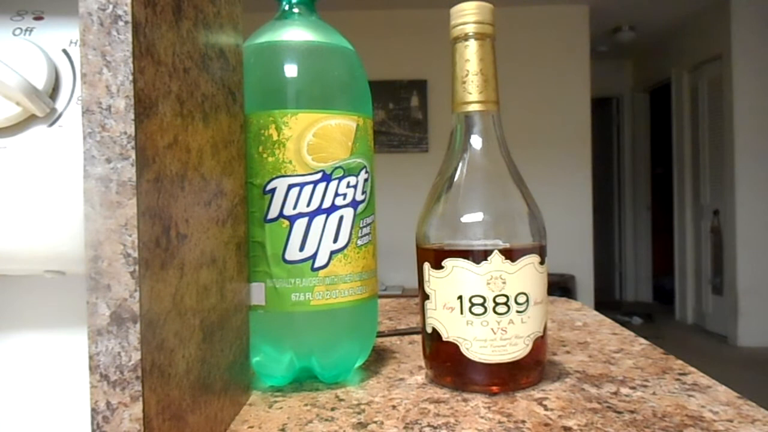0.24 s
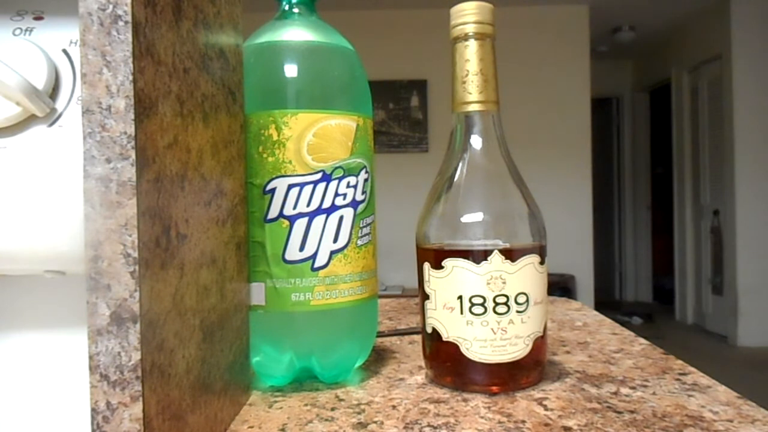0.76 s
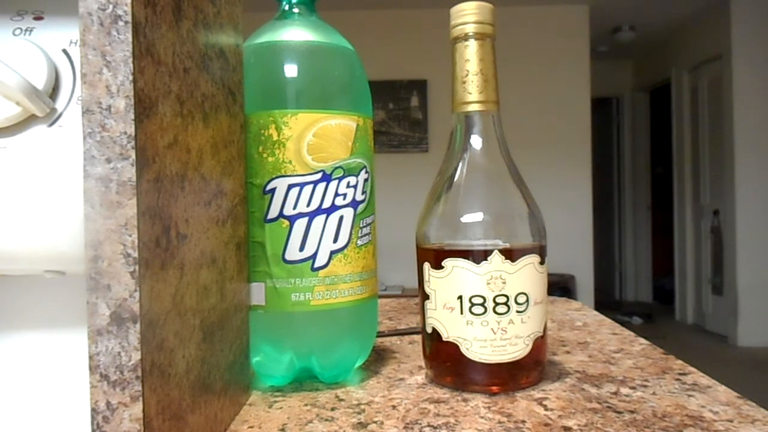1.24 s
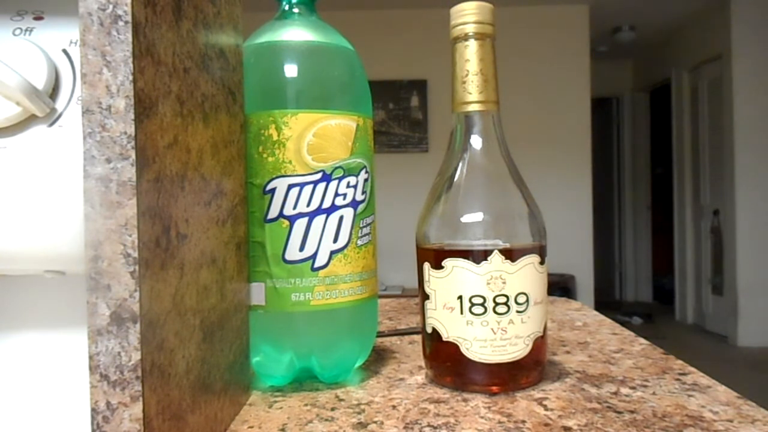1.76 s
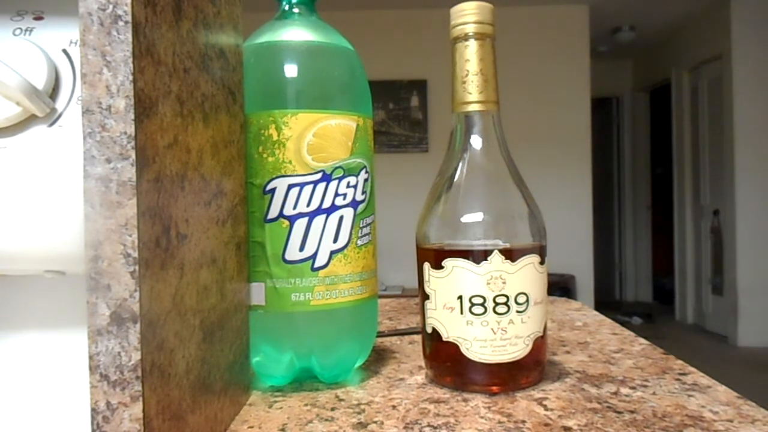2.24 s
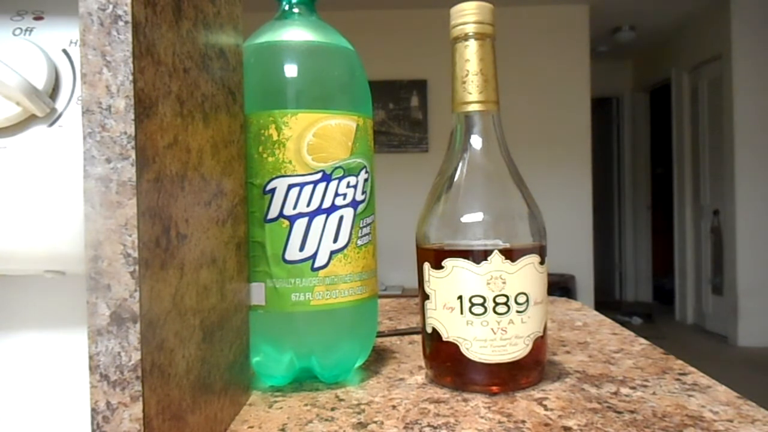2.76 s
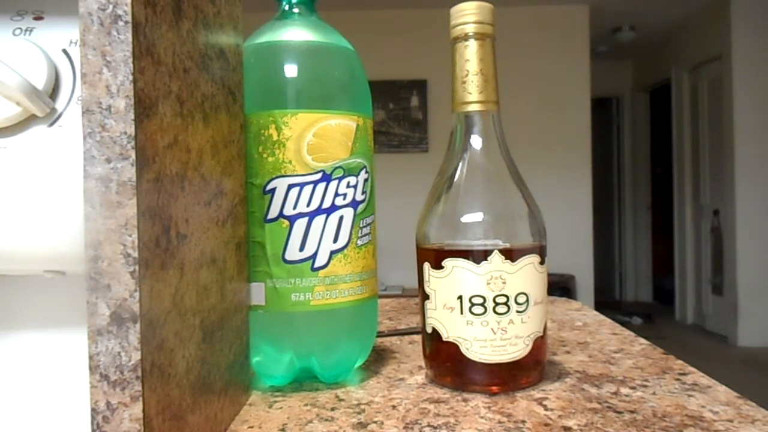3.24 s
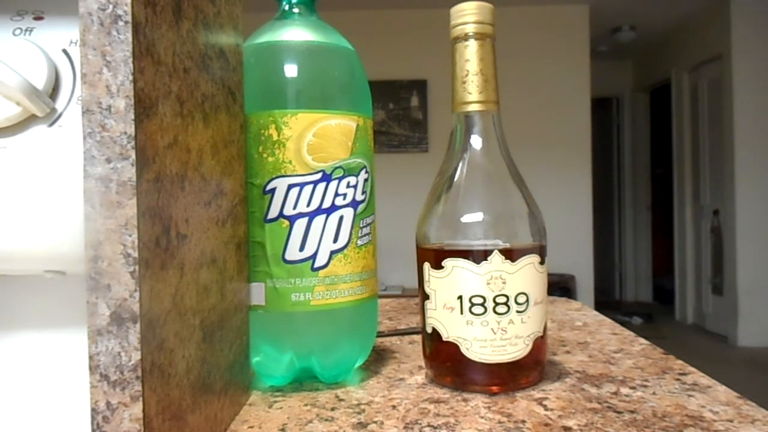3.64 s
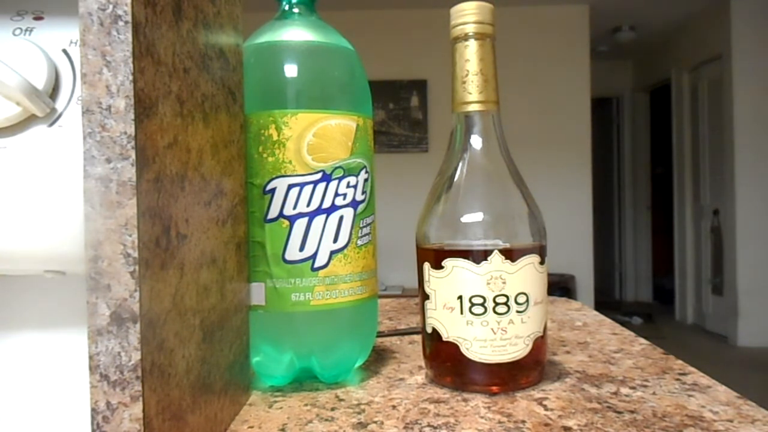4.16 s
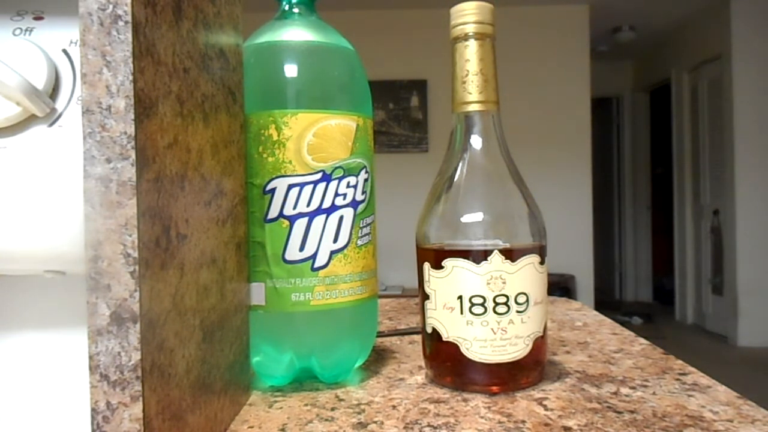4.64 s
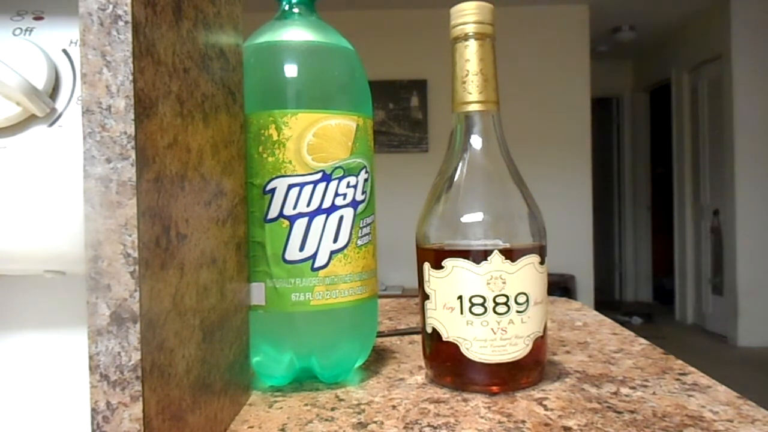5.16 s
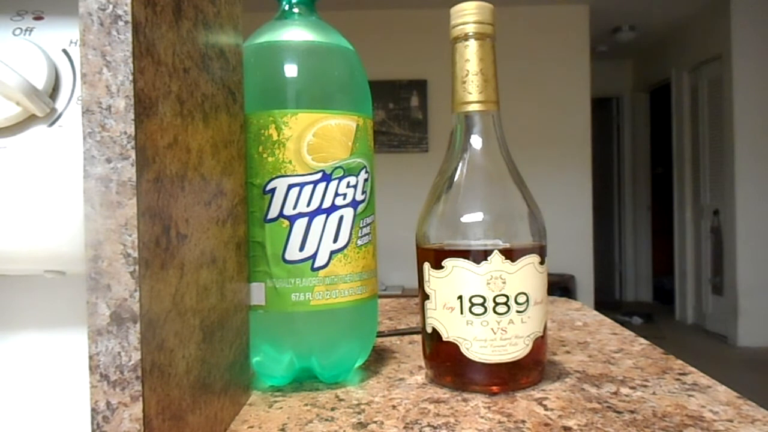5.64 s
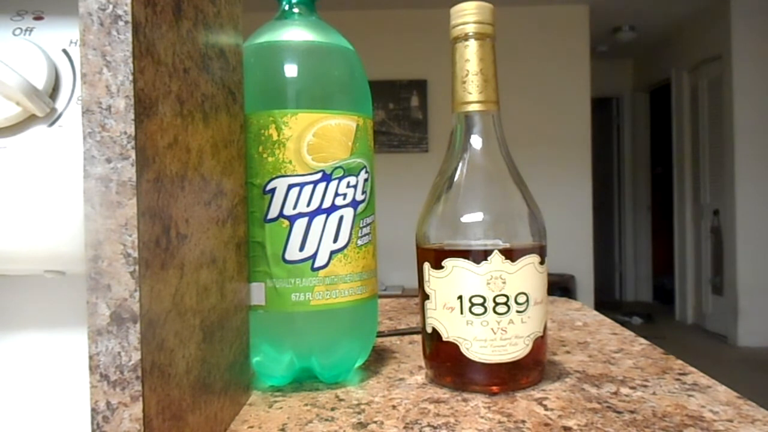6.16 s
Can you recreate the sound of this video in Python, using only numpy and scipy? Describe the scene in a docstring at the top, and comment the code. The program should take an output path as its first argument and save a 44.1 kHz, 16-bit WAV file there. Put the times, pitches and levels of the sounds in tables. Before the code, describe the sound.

Over a steady fridge hum in a hard-walled kitchen, a plastic ice tray is twisted, creaking densely while cubes break loose with sharp, loud cracks. Cubes then rattle and knock against the hollow plastic for over a second. After a quiet gap, one cube lands in a thick glass with a loud clink and several quick bounces. The microphone is a few steps away and distorts slightly on the hardest hits.

```python
"""Ice from a tray into a glass

A few steps from the microphone in a hard-walled kitchen, over the hum of a fridge and faint ticks of ice,
a plastic tray is twisted: it creaks and the cubes crack loose. They rattle and knock in the plastic, then
one drops into a thick glass and bounces. Contacts are shaped clicks with scattered reflections, most with
ringing modes; the motor is sines, the air filtered noise. The loudest hits overload the microphone."""
import sys
import numpy as np
from scipy import signal
from scipy.fft import rfft, irfft
from scipy.io import wavfile

SR = 44100
rng = np.random.default_rng(int(sys.argv[2]) if len(sys.argv) > 2 else 0)


def transcribe(signal):
    """Save signal, clipped to [-1, 1], as a 16-bit WAV file at the path in sys.argv[1]."""
    frames = np.atleast_2d(signal).T
    limited = np.clip(frames, -1, 1)
    pcm = np.round(limited * 32767).astype(np.int16)
    wavfile.write(sys.argv[1], SR, pcm)


N = 282681
TIME = np.arange(N) / SR

# broad colour of ice knocking on plastic: (frequency [Hz], relative level [dB])
KNOCK_COLOUR = [(100, -60), (240, -24.5), (310, -2), (480, -10), (750, 0), (1100, -3.5), (1300, -6),
                (2100, -3), (4400, -13.5), (5300, -19.5), (7500, -26), (9500, -42.5), (10800, -49),
                (15500, -43)]


def from_db(db):
    """Decibels to amplitude."""
    return 10 ** (np.asarray(db) / 20)


def unit_energy(x):
    """Scales a signal to a sum of squares of 1."""
    return x / np.sqrt(np.sum(x ** 2) + 1e-20)


def at_hz(points, hz):
    """Reads a table on a log-frequency axis."""
    freq, value = np.transpose(points)
    return np.interp(np.log(np.maximum(hz, 1)), np.log(freq), value)


def through(x, response):
    """Convolves a sound with the impulse response of a body or place."""
    return signal.fftconvolve(x, response)[:len(x)]


def add(out, s, sound):
    """Mixes a sound in at time s."""
    start = round(s * SR)
    out[start:start + len(sound)] += sound[:N - start]


def snap(colour, bright=0, pitch_hz=1000, bump_db=0, size=2048):
    """Minimum-phase click with this colour, a tilt [dB per octave] and one broad resonance; energy 1."""
    hz = np.maximum(np.arange(size // 2 + 1) * SR / size, 1)
    tilt = bright * np.log2(np.clip(hz, 300, 9000))
    bump = bump_db / (1 + (np.log2(hz / pitch_hz) / 0.18) ** 2)
    cepstrum = irfft(np.log(from_db(at_hz(colour, hz) + tilt + bump)))
    # folding the cepstrum forward packs the energy as early as possible
    cepstrum[1:size // 2] *= 2
    cepstrum[size // 2 + 1:] = 0
    return unit_energy(irfft(np.exp(rfft(cepstrum))))


def ringing(modes, vary_db=0):
    """Half a second of decaying sines with random phases and, if varied, random strengths; energy 1."""
    t = TIME[:SR // 2]
    swell = 1 - np.exp(-t / 0.00054)
    total = 0
    for hz, db, t60 in modes:
        strength = from_db(db + vary_db * rng.normal())
        sine = np.sin(2 * np.pi * (hz * t + rng.random()))
        decay = from_db(-60 * t / max(t60, .001))
        total = total + strength * unit_energy(swell * sine * decay)
    return unit_energy(total)


def scatter(t60, build_s):
    """Dense burst of first reflections off cupboards and counter, different from every spot; energy 1."""
    t = TIME[:SR // 2]
    knots = t[::66]
    uneven = from_db(1.6 * np.interp(t, knots, rng.standard_normal(len(knots))))
    swell = 1 - np.exp(-t / max(build_s, .0002))
    decay = from_db(-60 * t / max(t60, .01))
    return unit_energy(rng.standard_normal(len(t)) * uneven * swell * decay)


def blow(click, t60, build_s, modes, ring_db):
    """One contact, its first reflections and the struck body's ring; rms 1 if packed into 10 ms."""
    reflections = through(scatter(t60, build_s), click)
    ring = from_db(ring_db) * ringing(modes, vary_db=4)
    return unit_energy(reflections + ring) * np.sqrt(SR / 100)


def grains(per_s, spread_db):
    """Random clicks of uneven size; rms 1."""
    sizes = from_db(spread_db * np.clip(rng.standard_normal(N), -2, 2))
    signed = sizes * rng.choice([-1, 1], N)
    happens = rng.random(N) < per_s / SR
    return unit_energy(signed * happens) * np.sqrt(N)


def jostle(strength, colour, per_s, spread_db, t60, bump_db, count=12):
    """Small contacts of several cubes, each with a pitch and reflections of its own."""
    cubes = []
    for hz in np.geomspace(750, 6500, count):
        click = snap(colour, 0, hz, bump_db)
        cubes.append(unit_energy(through(scatter(t60, 0.00016), click)))
    contacts = sum(through(strength * grains(per_s / count, spread_db), cube) for cube in cubes)
    return contacts / np.sqrt(count)


def kitchen(x, tail_db, build_s):
    """Adds the room's tail band by band: long in the bass and near 4 kHz, shorter between, shortest on top."""
    # kitchen reverberation: (frequency [Hz], t60 [s])
    room_t60 = [(200, 0.79), (1500, 0.4), (4000, 0.73), (10000, 0.12)]
    t = TIME[:SR * 3 // 4]
    swell = 1 - np.exp(-t / max(build_s, .001))
    edges = np.geomspace(60, 20000, num=18)
    tail = 0
    for low, high in zip(edges, edges[1:]):
        band_pass = signal.butter(2, [low, high], "band", fs=SR, output="sos")
        band = signal.sosfilt(band_pass, rng.standard_normal(len(t)))
        decay = from_db(-60 * t / at_hz(room_t60, np.sqrt(low * high)))
        share = np.sqrt(2 * (high - low) / SR)   # a wide band holds more energy
        tail = tail + share * unit_energy(band * swell * decay)
    return x + from_db(tail_db) * through(x, tail)


def fridge():
    """Motor and fan tones with slowly wandering phase, over an even rush of air and a fan's resonances."""
    # motor and fan tones: (frequency [Hz], level [dB])
    hum = [(59.5, -72), (119, -74), (147, -73.5), (188, -69.5), (358, -65.5), (416, -59), (425, -63.5),
           (638, -66), (1125, -57), (1362, -61), (2826, -62), (3121, -59.5)]
    # colour of the rushing air: (frequency [Hz], relative level [dB])
    hiss = [(30, -26), (64, -16), (95, -31), (182, -9), (324, -9), (430, -5.5), (1170, -3), (1590, -7.5),
            (3300, -6.5), (4910, -12.5), (7080, -13.5), (9900, -28), (10700, -37.5), (15500, -31)]
    # resonances of the fan: (frequency [Hz], relative level [dB], t60 [s])
    fan_modes = [(418, -9, 0.027), (693, -0.5, 0.036), (1175, 0.5, 0.027), (3400, 2.5, 0.011),
                 (4550, 3.5, 0.0023)]
    knots = np.linspace(0, N / SR, num=40)
    tones = 0
    for hz, db in hum:
        wander = np.interp(TIME, knots, np.cumsum(rng.normal(0, 1.187, len(knots))))   # radians
        tones = tones + from_db(db) * np.sqrt(2) * np.sin(2 * np.pi * hz * TIME + wander)
    air = from_db(-42.7) * through(rng.standard_normal(N), snap(hiss))
    fan = from_db(-48.5) * through(rng.standard_normal(N), ringing(fan_modes))
    return tones + air + fan


def faint_ticks():
    """The warming ice gives tiny ticks at random moments, each a click with short reflections."""
    tick = unit_energy(through(scatter(0.021, 0.00027), snap(KNOCK_COLOUR, bright=1.5)))
    ticks = through(grains(per_s=16, spread_db=0.5), tick)
    return from_db(-55) * kitchen(ticks, tail_db=-5.0, build_s=0.018)


def swell_and_ease(peak_s):
    """Strain builds up to its peak and eases after it, at steady rates in dB."""
    rise_db_per_s, fall_db_per_s = 59, 76
    return from_db(np.minimum(rise_db_per_s * (TIME - peak_s), fall_db_per_s * (peak_s - TIME)))


def twisted_tray():
    """The tray creaks under strain in dense small contacts; cubes break free in cracks that ring it."""
    # ice cracking loose, with one low knock at 0.951 s: (time [s], level [dB], brightness [dB per octave], #
    # pitch of the cube [Hz], its prominence [dB])
    cracks = [(0.2653, -14.5, -1.5, 3780, 4), (0.389, -14, 0.5, 1800, 13), (0.4206, -2.5, 1.3, 4100, 3.5),
              (0.4378, -9, -2.5, 3000, 9.5), (0.54, -20.5, -0.5, 3850, 9), (0.8556, -7.5, -1.5, 3060, 2.5),
              (0.8606, -6, -3, 3200, 11), (0.951, -18.5, -4.5, 500, 14.5), (0.975, -17.5, -4.5, 3030, 9.5),
              (1.03, -24, -2, 1800, 15), (1.08, -23, -0.5, 2030, 14), (1.15, -24.5, -6.5, 3020, 25),
              (1.164, -21, 2, 3000, 6.5)]
    # broad colours of cracks and creak: (frequency [Hz], relative level [dB])
    crack_colour = [(150, -50), (300, -36), (600, -20.5), (900, -14), (1100, -4.5), (2100, -2.5),
                    (3100, -1), (4400, -3.5), (5100, -8), (7200, -10.5), (9000, -21.5), (10800, -37),
                    (15500, -31)]
    creak_colour = [(200, -37), (450, -29), (900, -10), (1800, -4.5), (2500, -6.5), (3400, 1), (4500, -1.5),
                    (5100, -8.5), (7000, -10.5), (9500, -20.5), (10800, -30), (15500, -23)]
    # ringing of the tray: (frequency [Hz], relative level [dB], t60 [s])
    tray_modes = [(1078, 1, 0.3), (1470, 2, 0.19), (2730, -14, 0.13), (3030, -3, 0.11), (3410, 2.5, 0.13),
                  (3630, 2, 0.17), (4010, 1, .2), (4300, -1, 0.35), (4510, 1, 0.27), (6250, -2, 0.06),
                  (7170, -21, 0.091)]
    # flexing of the tray: (time of greatest strain [s], level of its creak [dB])
    twists = [(0.46, -24), (0.86, -28.5), (1.16, -35.5)]
    # a strong crack is a clean break, a weak one crumbles on
    t60_at_0_db_s, doubling_drop_db = 0.12, 14   # t60 doubles with each such drop in level
    out = np.zeros(N)
    for s, db, bright, pitch_hz, bump_db in cracks:
        t60 = t60_at_0_db_s * 2 ** (-db / doubling_drop_db)
        click = snap(crack_colour, bright, pitch_hz, bump_db)
        add(out, s, from_db(db) * blow(click, t60, 0.0028, tray_modes, ring_db=-11))
    strain = np.max([from_db(db) * swell_and_ease(s) for s, db in twists], axis=0)
    out += jostle(strain, creak_colour, per_s=1000, spread_db=3.5, t60=0.079, bump_db=10)
    return kitchen(out, tail_db=-12.5, build_s=0.015)


def knocking_cubes():
    """Single cubes strike the plastic: glancing is bright, skittering, little ring; square is the reverse."""
    # knocks on the plastic: (time [s], level [dB], brightness [dB per octave],
    # pitch of the knock [Hz], its prominence [dB])
    knocks = [(1.815, -32, 7, 3440, 8), (1.999, -12.5, 4.5, 1700, 6.5), (2.057, -12.5, 5.5, 3430, 4.5),
              (2.2076, -14.5, 3, 2070, 6.5), (2.219, -12, -12, 1070, 19), (2.335, -14.5, 2.5, 3400, 8),
              (2.566, -14, 1, 790, 6), (2.587, -18.5, 3, 6200, 12.5), (2.653, -13, -0.5, 2180, 11.5),
              (2.736, -13, 0.5, 2050, -1), (2.908, -22.5, -0.5, 880, 2), (2.982, -25.5, 0, 1200, 5),
              (3.1075, -14.5, -0.5, 2000, 5.5), (3.294, -19.5, 1, 850, 4.5), (3.311, -21, 0.5, 3220, 11.5),
              (3.33, -25, 1.5, 2230, 3), (4.066, -29.5, 5, 2800, 2), (5.139, -36.5, 1.5, 705, 2)]
    # ringing of the plastic: (frequency [Hz], relative level [dB], t60 [s])
    plastic_modes = [(322.8, -6, 0.22), (589, -6.5, 0.9), (648, -6, 0.53), (857, -4.5, 0.11),
                     (928, -6, 0.37), (1086.4, 1.5, 0.15)]
    # t60 at brightness 0, its factor per step of brightness, its least value
    even_t60_s, skitter_growth, shortest_t60_s = 0.26, 1.21, 0.19
    even_ring_db, ring_loss_db = -10, 1.7   # at brightness 0; loss per step of brightness
    out = np.zeros(N)
    for s, db, bright, pitch_hz, bump_db in knocks:
        t60 = max(even_t60_s * skitter_growth ** bright, shortest_t60_s)
        ring_db = even_ring_db - ring_loss_db * bright
        click = snap(KNOCK_COLOUR, bright, pitch_hz, bump_db)
        add(out, s, from_db(db) * blow(click, t60, 0.003, plastic_modes, ring_db))
    return out


def surge(start_s, hold_s, release_db_per_s):
    """The heap of cubes shifts: quick attack, hold, steady release."""
    attack = np.clip((TIME - start_s) / 0.0061, 0, 1)
    return attack * from_db(-release_db_per_s * np.maximum(TIME - start_s - hold_s, 0))


def rattling_cubes():
    """Loose cubes tumble, slide and knock in random contacts; the hollow plastic booms under them."""
    # surges of the heap: (start [s], hold [s], level [dB], boom of the plastic [dB])
    surges = [(2.003, 0.022, -25.5, -27.5), (2.199, 0.099, -23, -26.5), (2.36, 0.1, -22.5, -31.5),
              (2.479, 0.086, -20.5, -25.5), (2.583, 0.15, -22, -32), (2.735, 0.047, -22.5, -28)]
    # broad colours of tumbling and of sliding: (frequency [Hz], relative level [dB])
    tumble_colour = [(100, -62), (240, -26), (310, -8.5), (480, -9), (850, 0), (1350, -5), (2200, -7.5),
                     (4300, -11.5), (5300, -20), (7500, -26), (9500, -40), (10800, -50), (15500, -51)]
    grit_colour = [(1500, -22), (4000, 6), (6500, -8), (8500, -12), (11000, -23), (15000, -19)]
    # boom of the hollow plastic: (frequency [Hz], relative level [dB], t60 [s])
    boom_modes = [(312, -4.5, 0.2), (358.8, -10, 0.27), (589, -9.5, 0.29), (1081, -9.5, 0.099)]
    tumble_release, boom_release = 106, 280   # dB per s
    tumble = np.max([from_db(db) * surge(s, hold, tumble_release) for s, hold, db, _ in surges], axis=0)
    boom = np.max([from_db(db) * surge(s, hold, boom_release) for s, hold, _, db in surges], axis=0)
    out = knocking_cubes()
    out += jostle(tumble, tumble_colour, per_s=300, spread_db=2.0, t60=0.11, bump_db=6)
    sliding = tumble ** 0.74   # follows this share of the tumble's swing in dB
    out += from_db(-23) * jostle(sliding, grit_colour, per_s=380, spread_db=5, t60=0.056, bump_db=14)
    out += through(boom * grains(per_s=450, spread_db=3.5), ringing(boom_modes))
    # the rattle carries almost no bass
    out = signal.sosfilt(signal.butter(4, 140, "high", fs=SR, output="sos"), out)
    return kitchen(out, tail_db=-7, build_s=0.019)


def ice_in_glass():
    """A cube hits the wall and bottom of the glass, bounces and settles; each contact rings its modes."""
    # landings: (time [s], level [dB], t60 [s], brightness [dB per octave])
    drops = [(5.4057, -2.5, 0.064, 0.5), (5.539, -13.5, 0.071, -0.5), (5.5964, -7.5, 0.16, 0),
             (5.63, -17, 0.11, 3.5), (5.72, -27, 0.19, -6.5)]
    # in each landing an edge touches, the face hits and the cube tips against the wall:
    # (delay [s], level [dB], brightness [dB per octave], ring of the glass [dB])
    landing = [(0, -7.5, -0.5, -11), (0.0033, 0, -1, -3), (0.0085, -5.5, 0.5, -8)]
    # broad colour of ice on glass: (frequency [Hz], relative level [dB])
    glass_colour = [(80, -81), (170, -20.5), (390, -26), (560, -16.5), (850, -14), (1200, 1), (2100, 2),
                    (2600, -2.5), (3500, -10), (4600, -15), (5700, -29.5), (8500, -32.5), (10800, -56),
                    (15500, -41)]
    # ringing of the glass: (frequency [Hz], relative level [dB], t60 [s])
    glass_modes = [(1197, 6, 0.14), (1440, 3, 0.067), (1471, 5, 0.17), (1576, -6, 0.59), (1790, -18, .25),
                   (1797, 9, 0.07), (1825, 0, 0.1), (2300, -15, 0.21), (2660, -7, 0.081), (2940, -8, 0.22),
                   (4670, -14, 0.12)]
    out = np.zeros(N)
    for s, db, t60, bright in drops:
        for delay_s, contact_db, contact_bright, ring_db in landing:
            click = snap(glass_colour, bright + contact_bright)
            contact = blow(click, t60, 0.00045, glass_modes, ring_db)
            add(out, s + delay_s, from_db(db + contact_db) * contact)
    return kitchen(out, tail_db=-6.5, build_s=0.011)


def scene():
    """Everything reaches one microphone."""
    return (twisted_tray() + rattling_cubes() + ice_in_glass() + faint_ticks() + fridge())[None]


def record(dry, drive_db=0.05):
    """Peaks clip at full scale, the microphone thins the bass and dulls the treble, and the top is cut."""
    # colour of the microphone: (frequency [Hz], level [dB])
    microphone = [(60, -5), (300, 0), (9000, -0.5), (10700, -8.5), (15500, -15.5)]
    clipped = np.clip(dry * from_db(drive_db), -1, 1)
    hz = np.arange(N // 2 + 1) * SR / N
    coloured = irfft(rfft(clipped) * from_db(at_hz(microphone, hz)), N)
    steep = signal.ellip(16, .1, 110, 15750, fs=SR, output="sos")   # low-pass at 15750 Hz
    return signal.sosfilt(steep, .96 * coloured)


dry = scene()
out = record(dry)
transcribe(out)
```